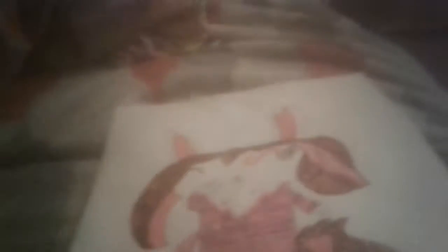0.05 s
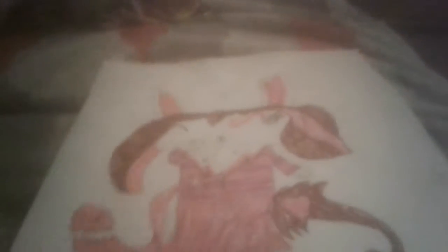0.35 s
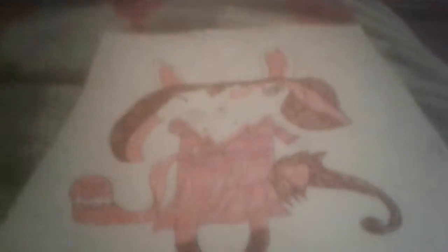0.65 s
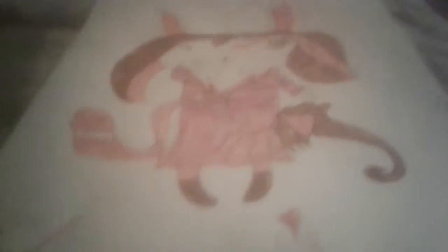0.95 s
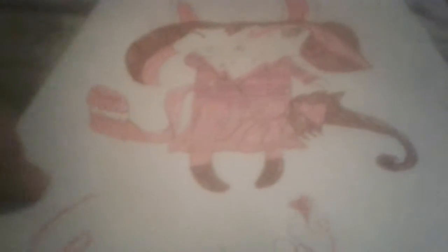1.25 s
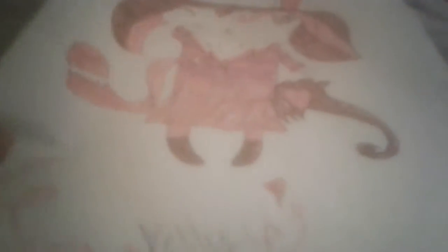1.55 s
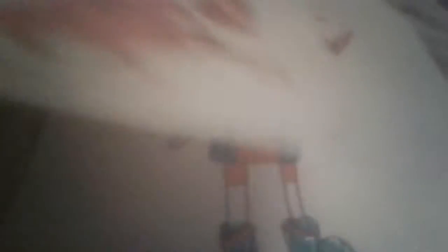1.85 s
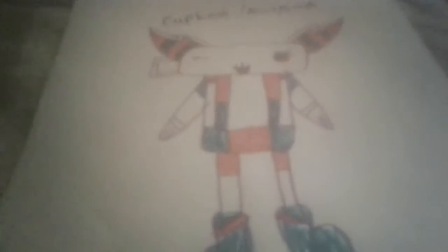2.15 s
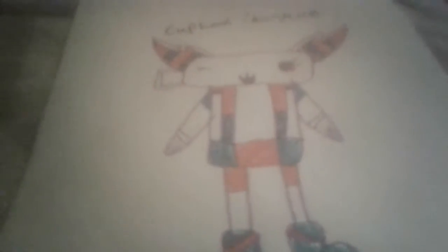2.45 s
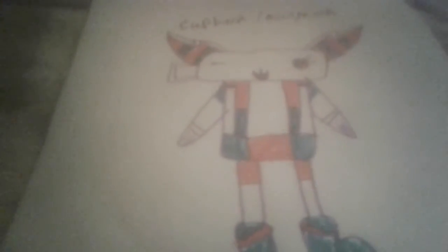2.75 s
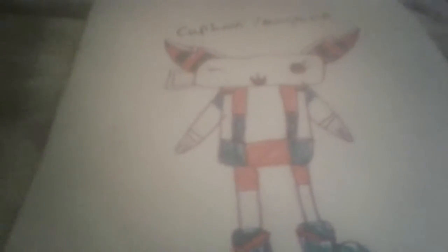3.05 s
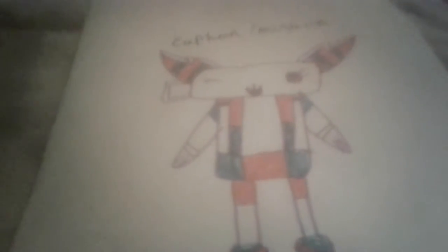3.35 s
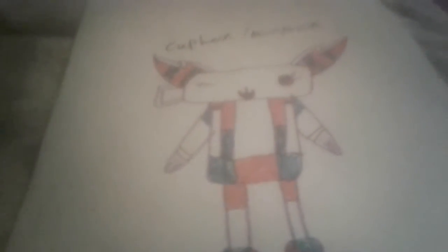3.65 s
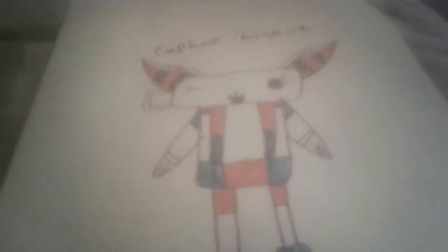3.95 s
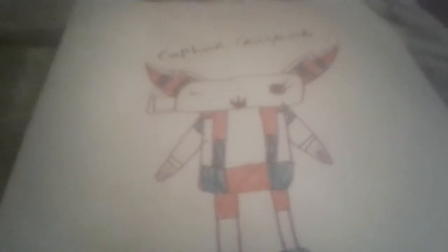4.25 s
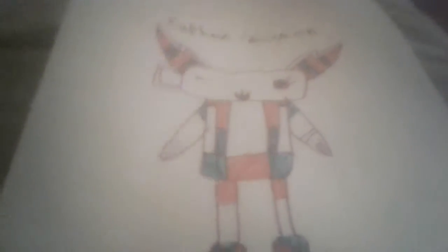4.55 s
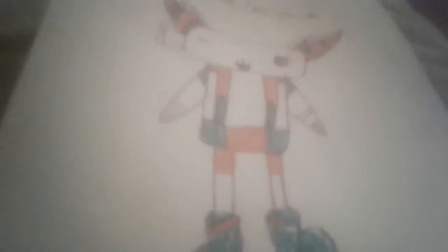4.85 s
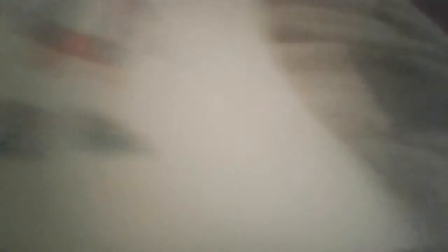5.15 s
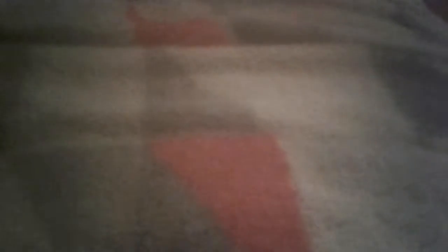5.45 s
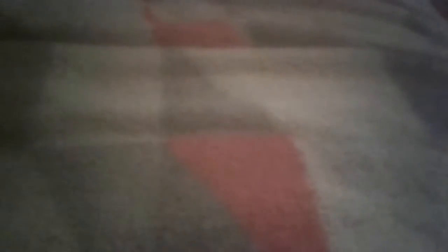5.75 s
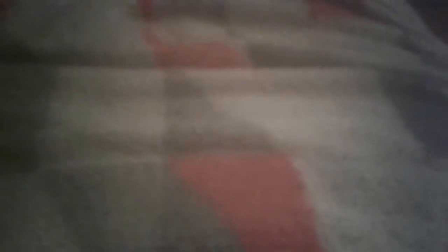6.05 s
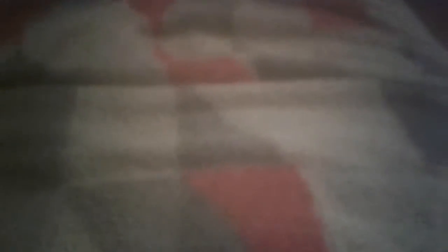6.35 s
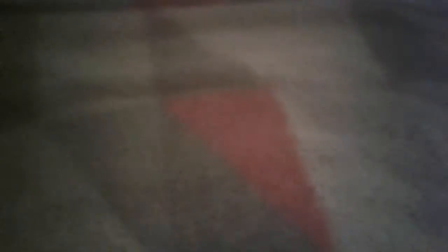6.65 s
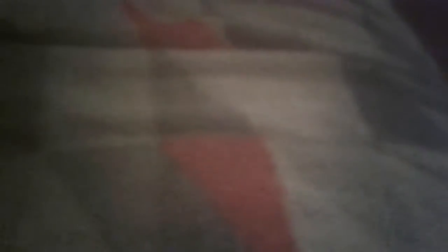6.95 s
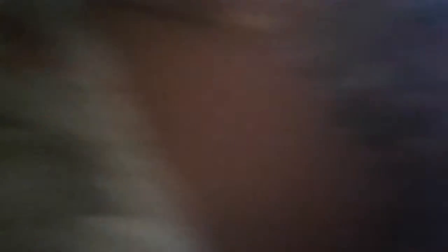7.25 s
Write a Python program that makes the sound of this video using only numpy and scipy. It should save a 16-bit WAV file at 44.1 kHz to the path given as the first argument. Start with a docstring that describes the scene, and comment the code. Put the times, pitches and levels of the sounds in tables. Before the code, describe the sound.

Sheets of paper slide over each other close to a handheld camera in a quiet, soft room. They hiss in short, uneven strokes, rustle as they bend and give sharp little snaps, the two loudest just past the middle. Near the end a hand rubs over the camera with a low, scratchy rumble and knocks it once. Faint room noise lies underneath.

```python
"""A quiet, soft room, where sheets of drawing paper are slid over each other and lifted away.
Close to a handheld camera, sliding sheets hiss as their fibres catch; bending sheets rustle lower
and buckle with sharp snaps. At the end a hand rubs over the camera's case and knocks it once.
Under it all lie faint room noise, a few low swells and the thin whine of the electronics."""
import sys
import numpy as np
from scipy import signal
from scipy.fft import rfft, irfft
from scipy.io import wavfile

SR = 44100
rng = np.random.default_rng(int(sys.argv[2]) if len(sys.argv) > 2 else 0)


def master_out(mix):
    """Clip the mix to full scale and print it as 16-bit PCM to the path in sys.argv[1]."""
    frames = np.transpose(np.atleast_2d(mix))
    ceiling = np.clip(frames, -1, 1)
    pcm = np.round(ceiling * 32767).astype(np.int16)
    wavfile.write(sys.argv[1], SR, pcm)


N = 325899
TIME = np.arange(N) / SR


def amp(db):
    """Decibels to gain."""
    return 10 ** (np.asarray(db) / 20)


def unit(x):
    """Scales to rms 1."""
    return x / np.sqrt(np.mean(x ** 2) + 1e-20)


def fader(points):
    """Gain per sample from (time [s], level [dB]) points, silent outside them."""
    times, db = np.transpose(points)
    return amp(np.interp(TIME, times, db, left=-200, right=-200))


def add(mix, start_s, sound):
    """Mixes a sound in at its start time."""
    part = mix[round(start_s * SR):][:len(sound)]
    part += sound[:len(part)]


def colour(x, eq, size=2048):
    """Causal filter of unit energy, its EQ points joined on a log-frequency axis."""
    hz, db = np.transpose(eq)
    bins_hz = abs(np.fft.fftfreq(size, 1 / SR))
    log_gain = np.log(amp(np.interp(np.log(bins_hz + 1), np.log(hz + 1), db)))
    taps = np.fft.ifft(np.exp(np.conj(signal.hilbert(log_gain)))).real  # minimum phase
    return signal.oaconvolve(x, taps / np.linalg.norm(taps))[:len(x)]


def wander(rate_hz):
    """Slow random motion of rms 1."""
    hz = np.fft.rfftfreq(N, 1 / SR)
    return unit(irfft(rfft(rng.standard_normal(N)) / (1 + (hz / rate_hz) ** 4), N))


def wavering_tone(centre_hz, width_hz):
    """Noise in a narrow band, of rms 1."""
    detune = 2 * (np.fft.rfftfreq(N, 1 / SR) - centre_hz) / width_hz
    return unit(irfft(rfft(rng.standard_normal(N)) / (1 + detune ** 2), N))


def friction(eq, slips_per_s, spread_db, bunching, catch_hz):
    """Tiny uneven slips, bunched as the surfaces catch and let go, heard through the rubbed body."""
    sizes = amp(spread_db * np.minimum(rng.exponential(1, N), 4))
    slips = rng.choice([-1, 1], N) * sizes * (rng.random(N) < slips_per_s / SR)
    grip = 1 + bunching * np.tanh(wander(catch_hz))
    return unit(colour(slips * grip, eq))


def strokes(rows, exponents, catch_s=0.002, stop_s=0.014):
    """Envelopes of three layers, each following a power of the effort as strokes grow and ease off."""
    power = np.zeros((3, N))
    for start, rise_s, fall_s, top_db, rise_db, fall_db, second_db, third_db in rows:
        top = start + rise_s
        end = top + fall_s
        effort = amp(np.interp(TIME, [start, top, end], [-rise_db, 0, -fall_db]))
        effort *= np.clip((TIME - start) / catch_s, 0, 1)
        effort *= np.exp(-np.clip(TIME - end, 0, 1) / stop_s)
        for layer, offset_db in enumerate([0, second_db, third_db]):
            power[layer] += (amp(top_db + offset_db) * effort ** exponents[layer]) ** 2
    return np.sqrt(power)


# dark bed of noise: (frequency [Hz], EQ gain [dB])
ROOM_TONE_EQ = [(20, -15), (33, -5), (60, 2), (150, 3), (400, -0.5), (600, -5), (1000, -11), (2300, -16.5),
                (3500, -23), (6000, -31), (7200, -34.5), (15000, -35.5)]
def room_tone(level_db=-71.5):
    """Steady noise of the room and the microphone."""
    return amp(level_db) * unit(colour(rng.standard_normal(N), ROOM_TONE_EQ))


# thin, high tones: (frequency [Hz], level [dB])
WHINE_TONES = [(5850, -95), (5319, -101), (11200, -113), (11500, -109), (11703, -103.5)]
def electronics_whine(skirt_db=-4):
    """The camera's electronics whine, each tone with a fuzzy skirt."""
    out = np.zeros(N)
    for hz, db in WHINE_TONES:
        tone = np.sqrt(2) * np.sin(2 * np.pi * hz * TIME)
        out += amp(db) * (tone + amp(skirt_db) * wavering_tone(hz, width_hz=110))
    return out


# soft swells under the rustle: (time [s], length [s], pitch [Hz], level at the crest [dB])
LOW_SWELLS = [(.40, 0.3, 180, -67), (2.12, 0.23, 194, -68.5), (4.6, 0.45, 175, -71)]
def low_swells():
    """Faint low tones that rise and fade while the sheets are held."""
    out = np.zeros(N)
    for start, length_s, hz, db in LOW_SWELLS:
        size = round(length_s * SR)
        tone = unit(wavering_tone(hz, width_hz=50)[:size])
        add(out, start, amp(db) * tone * np.hanning(size))
    return out


# rumble of the pressed case, hiss of skin and its airy whistle: (frequency [Hz], EQ gain [dB])
RUMBLE_EQ = [(25, -15), (60, -0.5), (150, 5), (400, 2.5), (700, 0.5), (1000, -5.5), (2200, -9), (4000, -20),
             (9000, -59)]
SKIN_EQ = [(200, -1.5), (1200, 2.5), (2400, -2), (4000, 4), (5600, -2), (7000, -13.5), (8500, -27),
           (10000, -36), (15000, -45)]
WHISTLE_EQ = [(3000, -14), (6300, -3.5), (7400, -4.5), (8000, 2), (8500, -10), (9500, -15), (11000, -24),
              (15000, -37)]
# the hand presses harder, then eases off; levels before the mix trims: (time [s], rise [s], fall [s],
# top rumble level [dB], rise [dB], fall [dB], skin offset [dB], whistle offset [dB])
HAND_STROKES = [ (6.655, 0.028, .006, -54.5, 26.5, 7, -18, -42),
                (6.697, 0.0065, 0.037, -49, 4, 10, -7.5, -41),
                (6.745, .065, 0.074, -43.5, 12.5, 15.5, -6.5, -28.5),
                (6.885, 0.016, 0.064, -55.5, 7, 7, 2, -13.5), (6.965, 0.0091, 0.011, -60, 5, 3, 6.5, -6),
                (6.99, 0.033, 0.033, -65.5, 1, 2, 6.5, 2), (7.115, 0.25, .13, -66.5, 1, 2, -3, -14.5)]
def hand_rub():
    """Skin sticks and slips on the case, which carries it straight to the microphone."""
    rumble = friction(RUMBLE_EQ, slips_per_s=2400, spread_db=1.0, bunching=0.17, catch_hz=50)
    skin = friction(SKIN_EQ, slips_per_s=7600, spread_db=2.0, bunching=0.22, catch_hz=61)
    whistle = friction(WHISTLE_EQ, slips_per_s=12000, spread_db=-1.0, bunching=0.19, catch_hz=59.4)
    pressing, rubbing, whistling = strokes(HAND_STROKES, exponents=(1, 0.88, 0.61))
    return rumble * pressing * amp(2.3) + skin * rubbing * amp(1.5) + whistle * whistling * amp(6.5)


# a finger knocks the case and rocks on it: (time [s], level before filtering [dB], contact time [ms])
FINGER_BLOWS = [(7.07, -7, 0.25), (7.082, -26, 0.04), (7.088, -32, 0.092), (7.0926, -29.5, 0.4)]
# the case rocks in the grip: (frequency [Hz], level before filtering [dB], time to fall 60 dB [s])
CASE_MODES = [(111, -20, 0.054), (283, -55, 0.024)]
# the finger skids: (time [s], level [dB])
SKID_FADER = [(7.0695, -62), (7.0710, -16.5), (7.0735, -38), (7.077, -29.5), (7.081, -23.5), (7.084, -40),
              (7.092, -48), (7.102, -62), (7.11, -68)]
# dull scuff of the skid: (frequency [Hz], EQ gain [dB])
SKID_EQ = [(20, -49), (50, -22), (90, 8), (300, 3), (1000, 0), (2500, -4.5), (4500, -7.5), (6000, -22.5),
           (8000, -24), (10000, -35), (15000, -36)]
def case_knock(thud_delay_s=0.00433, port_hz=58, fingertip_hz=7000, rebound=0.094):
    """Pressure pulses with their rebounds, the case's dull thud, and a short skid."""
    out, t = np.zeros(N), np.arange(SR // 5) / SR
    for start, db, contact_ms in FINGER_BLOWS:
        contacts = t / (contact_ms / 1000)
        push = contacts * np.exp(1 - contacts)
        recoil = (contacts / 7 * np.exp(1 - contacts / 7)) ** 2
        add(out, start, amp(db) * (push - rebound * recoil))
    for hz, db, t60 in CASE_MODES:
        thud = amp(db - 60 * t / t60) * np.sin(2 * np.pi * hz * t)
        add(out, FINGER_BLOWS[0][0] + thud_delay_s, thud)
    skid = friction(SKID_EQ, slips_per_s=7900, spread_db=0.5, bunching=0.15, catch_hz=300)
    out += fader(SKID_FADER) * skid
    # the port leaks the deepest bass away, and the soft fingertip rounds each blow
    return signal.sosfilt(signal.butter(3, [port_hz, fingertip_hz], "bandpass", fs=SR, output="sos"), out)


# papery ring of the whole sheet: (frequency [Hz], EQ gain [dB])
SHEET_EQ = [(25, -46), (60, -23.5), (200, -15), (600, -4.5), (1000, -9.5), (1900, 0), (3000, -7),
            (5000, -4.5), (6500, -12), (8500, -39.5), (15000, -49)]
def sheet_flutter(t, split_hz=2600, low_decay_s=0.0069, high_decay_s=0.0035, high_db=2):
    """Bending waves scatter over the sheet; the short ones die first."""
    waves = colour(rng.standard_normal(len(t)), SHEET_EQ)
    low = signal.sosfiltfilt(signal.butter(2, split_hz, fs=SR, output="sos"), waves)
    return low * np.exp(-t / low_decay_s) + amp(high_db) * (waves - low) * np.exp(-t / high_decay_s)


def crease_crackle():
    """Tiny creases tick through the sheet."""
    return friction(SHEET_EQ, slips_per_s=230, spread_db=5.5, bunching=0.23, catch_hz=30)


def tremble(envelope, tail_db, settle_s=0.084):
    """Gives an envelope a fading tail: the sheet goes on trembling after a stroke."""
    pole = np.exp(-1 / (settle_s * SR))
    tail_power = signal.lfilter([1 - pole], [1, -pole], envelope ** 2)
    return np.sqrt(envelope ** 2 + amp(tail_db) ** 2 * tail_power)


# sliding hiss, bending rustle and the fizz of an edge dragged fast: (frequency [Hz], EQ gain [dB])
HISS_EQ = [(300, -34), (1000, -23.5), (1700, -3.5), (2400, 1), (3200, 1.5), (4400, 1.5), (5700, -1),
           (6600, -11.5), (7600, -27.5), (9000, -43.5), (15000, -59)]
RUSTLE_EQ = [(25, -34), (60, -12.5), (150, 5), (300, 6), (600, 3), (1000, 0.5), (1700, 1), (2400, -3.5),
             (3500, -14), (6000, -25), (10000, -56)]
FIZZ_EQ = [(3000, -25.5), (6000, 14), (7300, 10.5), (8300, 1.5), (9500, -5.5), (12000, -9), (14000, -21),
           (16000, -40.5)]
# a sheet speeds up over another, then slows; levels before the mix trims: (time [s], rise [s], fall [s],
# top hiss level [dB], rise [dB], fall [dB], rustle offset [dB], fizz offset [dB])
PAPER_STROKES = [ (0.0, 0.068, 0.055, -64, 7.5, 7.5, -12, -39), (0.12, 0.037, 0.032, -64.5, 8, 2, -22, -43),
                 (0.335, .02, 0.12, -75, -5, -0.5, -26, -26), (0.497, .055, .25, -61, 0.5, 8, -19, -31),
                 (1.133, 0.012, 0.15, -63, 7, 15, -17, -44), (1.41, 0.043, 0.41, -64.5, 15, 16, -16.5, -26),
                 (1.69, 0.1886, 0.015, -46, 20.5, 0, -18, -14.5),
                 (1.908, 0.044, .012, -51.5, 4.5, 15, -19, -15),
                 (1.965, 0.029, 0.059, -72, -3.5, 17, 7.5, -8.5),
                 (2.091, 0.011, 0.019, -62, 7.5, 8.5, -2.5, -15),
                 (2.583, 0.026, 0.029, -60, 11.5, 1, -2.5, -30), (2.65, 0.087, 0.07, -54, 2.5, 5, -8, -35),
                 (3.80, .06, .04, -72, 7, -3, -19, -21), (3.9, .1, 0.039, -59.5, 5, -0.5, -21.5, -21),
                 (4.151, 0.0055, 0.023, -57.5, -1, 5.5, -22, -38),
                 (4.185, 0.21, 0.11, -44, 12.5, 11, -23.5, -24),
                 (4.51, 0.054, 0.14, -55, -0.5, 16, -11.5, -25.5),
                 (4.68, 0.087, 0.02, -73.5, 3.5, 5, 8, -20), (4.79, 0.031, 0.051, -67, 5, 11, -26, -24),
                 (5.068, 0.028, 0.028, -71, 3.5, 3.5, 6, -17), (5.145, 0.029, 0.039, -70.5, -1, 7, 10, -24),
                 (5.595, 0.055, 0.046, -75.5, 0, 2.5, 7.5, -22), (5.891, 0.014, .015, -69, 2, 3, -6.5, -15),
                 (5.921, 0.015, 0.13, -51.5, 10.5, 19.5, -7.5, -23)]
# the held sheets creep between strokes: (time [s], level before the mix trims [dB])
CREEP_FADER = [(0, -81.5), (.7, -73.5), (.85, -73.5), (1.1, -77.5), (2.2, -78), (2.55, -94), (3.2, -88),
               (3.38, -79.5), (3.65, -84.5), (4.1, -76), (5.04, -75), (5.45, -92.5), (6.15, -81.5),
               (6.5, -100)]
def sliding_sheets():
    """Fibres catch as sheet slides on sheet; the bending sheet radiates a lower rustle and crackles."""
    hiss = friction(HISS_EQ, slips_per_s=12000, spread_db=1.5, bunching=0.28, catch_hz=60)
    rustle = friction(RUSTLE_EQ, slips_per_s=3500, spread_db=3.5, bunching=0.22, catch_hz=45)
    fizz = friction(FIZZ_EQ, slips_per_s=33900, spread_db=5.5, bunching=0.16, catch_hz=70)
    sliding, bending, dragging = strokes(PAPER_STROKES, exponents=(1, 1, 1.4))
    creep = fader(CREEP_FADER)
    return (hiss * np.hypot(tremble(sliding, tail_db=-21), creep) * amp(-0.5)
            + rustle * np.hypot(tremble(bending, tail_db=-8.5), creep * amp(-6)) * amp(5.5)
            + crease_crackle() * bending * amp(-1.5)
            + fizz * dragging * amp(7.5))


# bright attack of a snap: (frequency [Hz], EQ gain [dB])
CRACK_EQ = [(80, -21), (300, -24.5), (1000, -23), (2200, 1), (4500, 6), (6300, 3), (7500, -8.5),
            (9000, -25.5), (12000, -14), (16000, -62)]
def snap(hz, swell_ms, crack_db, flutter_db, sag=0.093, cutoff_ratio=1.83):
    """A crease flips: a crack, a few cycles of the buckling patch, then a flutter of the whole sheet."""
    t = np.arange(SR // 10) / SR
    swell_s = swell_ms / 1000
    age = t / swell_s
    # short bending waves travel fastest, so the pitch sags
    pitch_hz = hz * (1 + sag * (1 - np.minimum(age, 4)))
    patch = (age * np.exp(1 - age)) ** 2 * np.sin(2 * np.pi * np.cumsum(pitch_hz) / SR)
    flips = np.zeros(len(t))
    flips[0] = 0.74  # the crease gives way
    add(flips, 1.7 * swell_s, -np.ones(1))
    crack = amp(crack_db) * colour(flips, CRACK_EQ)
    flutter = amp(flutter_db) * sheet_flutter(t) * (1 - np.exp(-age))
    # a large, low-pitched patch flips slowly, so its crack and flutter are duller
    lowpass = signal.butter(3, cutoff_ratio * hz, fs=SR, output="sos")
    return 0.72 * patch + signal.sosfilt(lowpass, crack + flutter)


# snap cues: (time [s], gain [dB], pitch [Hz], swell time [ms], crack gain [dB], flutter gain [dB])
BUCKLES = [ (0.7749, -30.5, 2420, 0.37, 11, -13), (1.425, -50.5, 1690, 1.5, -7, -9),
           (1.6538, -40, 1900, 0.18, -16, -4.5), (1.8486, -34.5, 2200, 0.28, 0, -4),
           (1.977, -42, 1420, 1.3, 13, -2), (1.9826, -44.5, 2780, .8, 18.5, -2),
           (2.0044, -40.5, 2660, 0.34, 3, -10.5), (2.343, -54, 1290, 0.81, -8, -5),
           (2.654, -36.5, 2140, .7, 12.5, -5.5), (2.7089, -35, 3580, 0.38, -8, -4),
           (3.8872, -34, 5230, .35, 0, -29), (3.8999, -28.5, 4600, 0.39, -6, -16),
           (3.9517, -11, 4930, .45, -3.5, -26.5), (3.9627, -22, 4540, 0.58, 0, -18),
           (4.3978, -12.5, 4910, .62, 10, -21), (4.476, -32.5, 1960, 0.42, 3, -4),
           (4.522, -41.5, 1640, 2.9, -2, 2), (4.5448, -46.5, 1370, 1.9, -2, -1),
           (4.627, -44, 3770, 1.2, 1, -10), (4.656, -46.5, 3620, 1.5, 3, -5),
           (4.6842, -47, 1900, 0.43, -2, -3), (4.745, -50, 1370, 1.7, -6, -10),
           (4.7666, -42.5, 1550, 0.56, 14, -3), (4.8416, -45.5, 2960, .33, -1, -25),
           (5.076, -44, 1100, .4, -3, -14), (5.0871, -40, 3290, .3, 9.5, -3.5),
           (5.151, -45.5, 1720, 2.2, -10, 3), (5.1691, -34.5, 2130, 0.27, 8, -1.5),
           (5.1877, -34, 1600, 0.3, 7, -27), (5.554, -57.5, 4230, 1.2, 17, 1.5),
           (5.6016, -52.5, 4530, 0.36, 15, -18), (5.615, -54, 2000, 0.48, 7, -6),
           (5.672, -53, 2200, 0.83, -3, -4), (5.93, -43.5, 1900, 0.48, -3, 0.5),
           (7.243, -47.5, 3520, .4, 9.5, -17.5), (7.3518, -44.5, 2310, 0.28, 11, -13)]
def buckling_sheets():
    """The paper snaps each time it buckles."""
    out = np.zeros(N)
    for start, db, *shape in BUCKLES:
        add(out, start, amp(db) * snap(*shape))
    return out


def soft_room(x, t60=0.17, wet_db=-15, absorb_hz=3000):
    """A small furnished room: a faint, short tail whose treble the cloth soaks up."""
    t = np.arange(SR // 2) / SR
    echoes = rng.standard_normal(len(t)) * (rng.random(len(t)) < 0.08)
    echoes *= (t > 0.005) * amp(-60 * t / t60)  # pre-delay and decay
    cloth = signal.butter(1, absorb_hz, fs=SR, output="sos")
    tail = signal.sosfilt(cloth, echoes / np.linalg.norm(echoes))
    return x + amp(wet_db) * signal.oaconvolve(x, tail)[:N]


def scene():
    """Paper in the room, the hand dry on the case, and the background, all centred."""
    paper = soft_room(sliding_sheets() + buckling_sheets())
    handling = hand_rub() + case_knock()
    background = low_swells() + room_tone() + electronics_whine()
    return np.tile(paper + handling + background, (2, 1))


def record(dry, hiss_db=-98, cutoff_hz=15750):
    """One microphone feeds both channels, each with a trace of its own hiss; then a steep high cut."""
    noisy = dry + amp(hiss_db) * rng.standard_normal((2, N))
    high_cut = signal.firwin(511, cutoff_hz, window=("kaiser", 9), fs=SR)
    return signal.oaconvolve(noisy, high_cut[None], "same", axes=1)


dry = scene()
out = record(dry)
master_out(out)
```